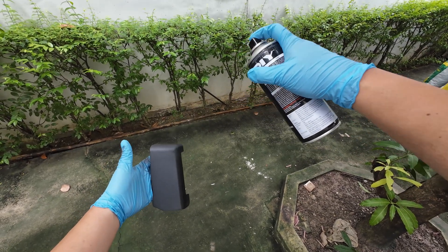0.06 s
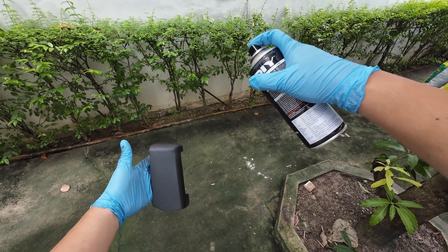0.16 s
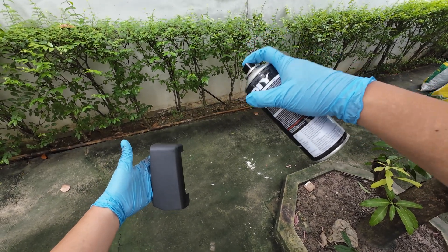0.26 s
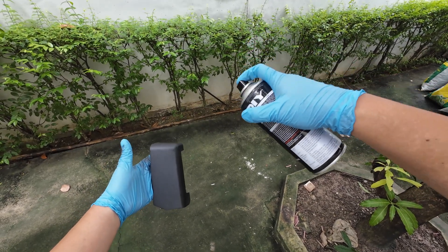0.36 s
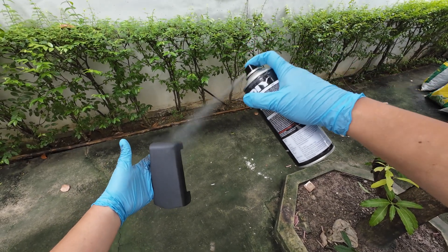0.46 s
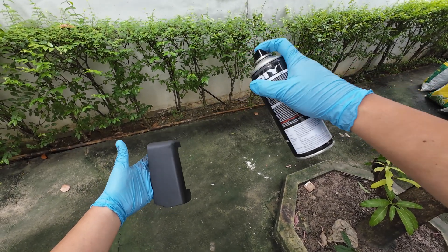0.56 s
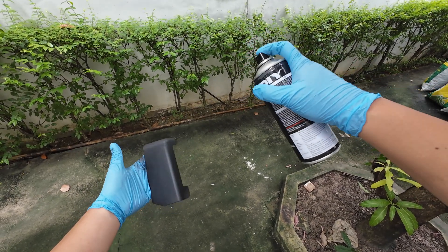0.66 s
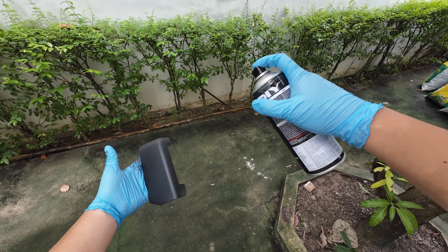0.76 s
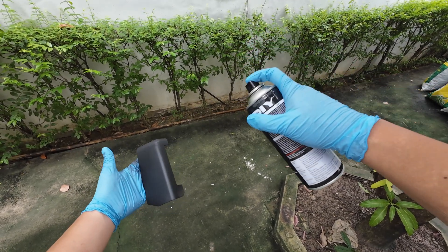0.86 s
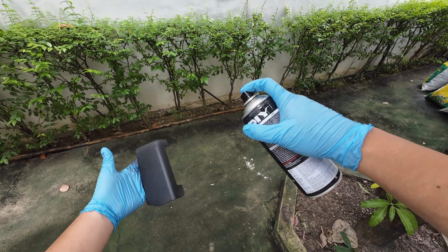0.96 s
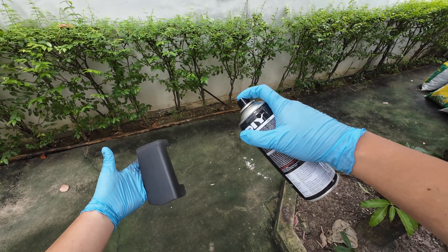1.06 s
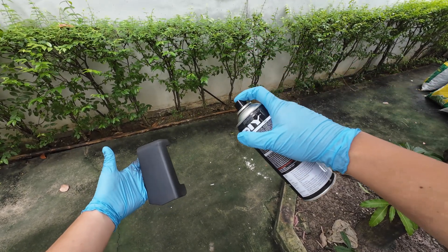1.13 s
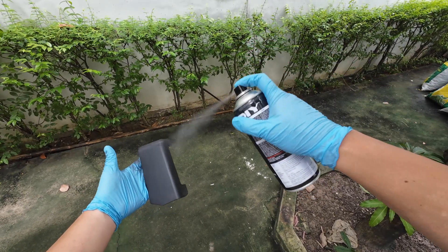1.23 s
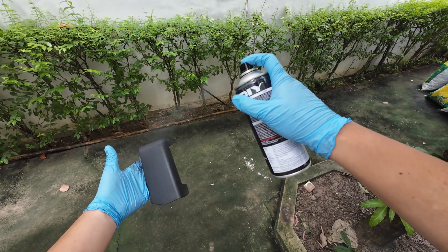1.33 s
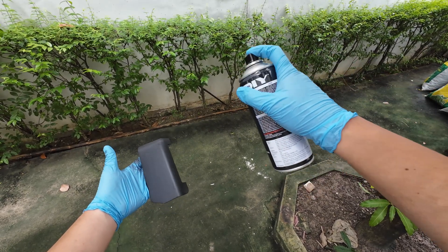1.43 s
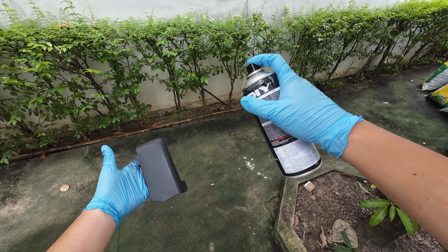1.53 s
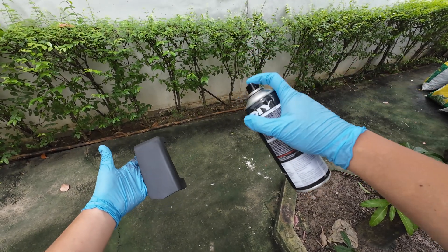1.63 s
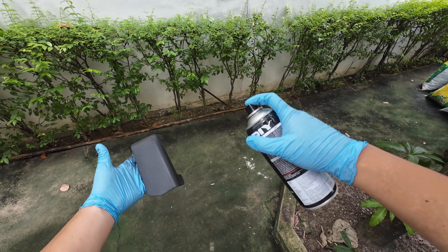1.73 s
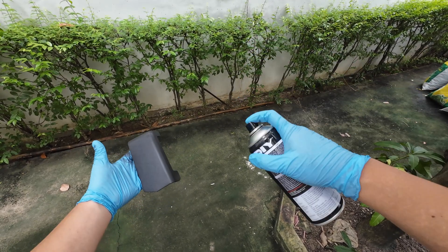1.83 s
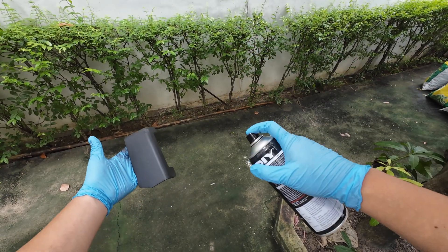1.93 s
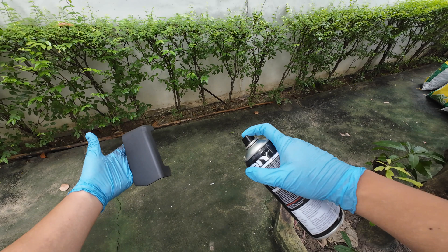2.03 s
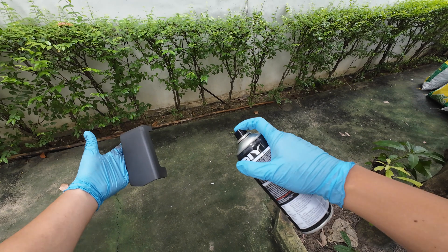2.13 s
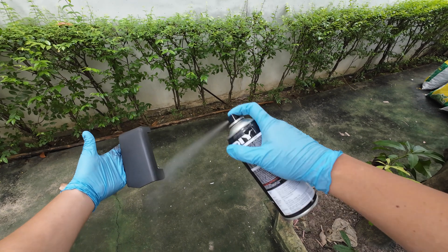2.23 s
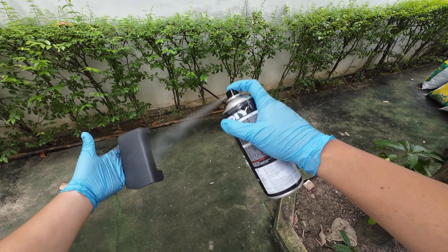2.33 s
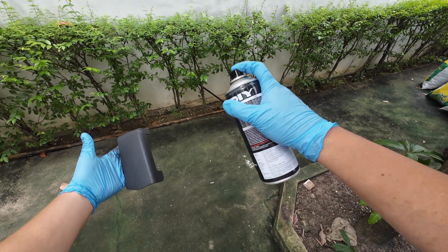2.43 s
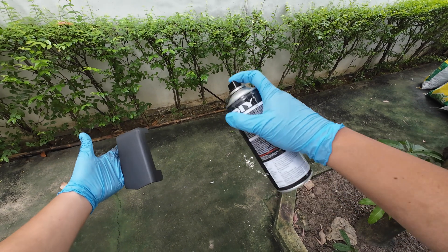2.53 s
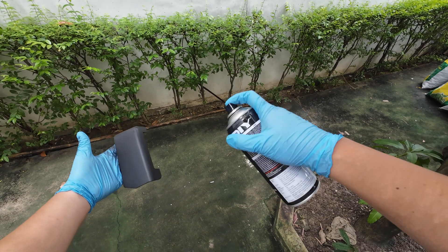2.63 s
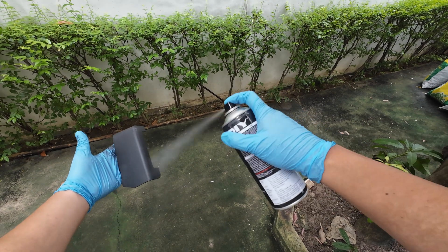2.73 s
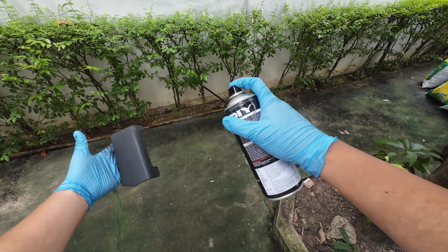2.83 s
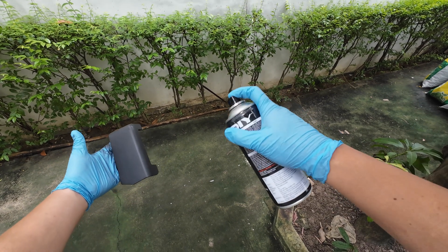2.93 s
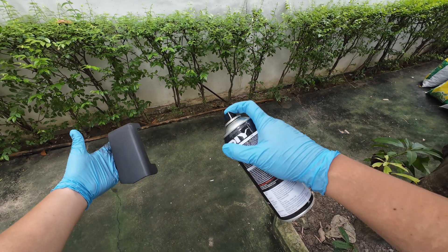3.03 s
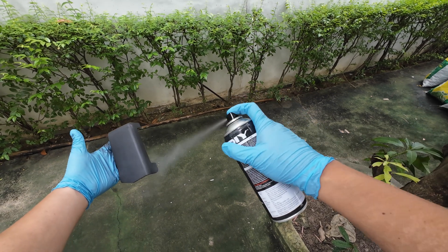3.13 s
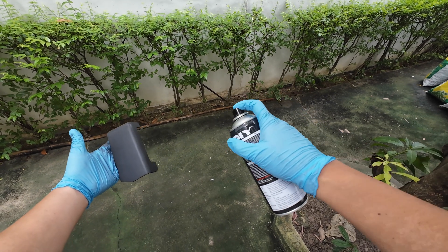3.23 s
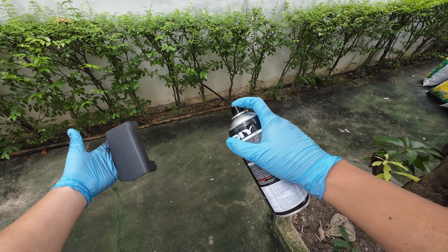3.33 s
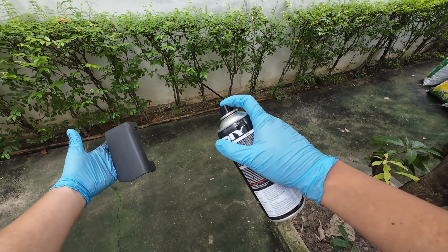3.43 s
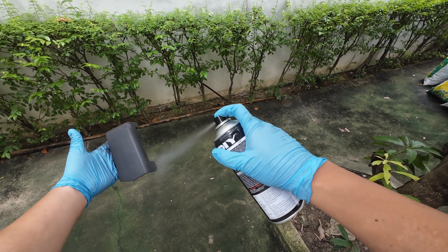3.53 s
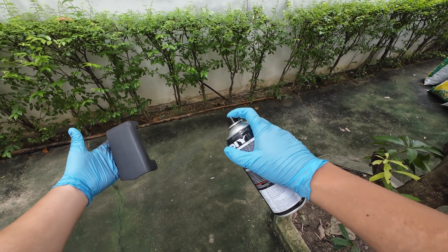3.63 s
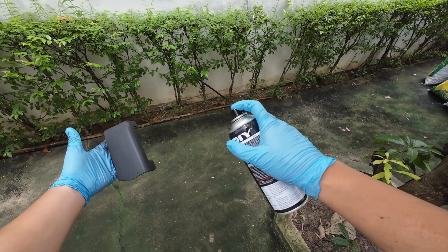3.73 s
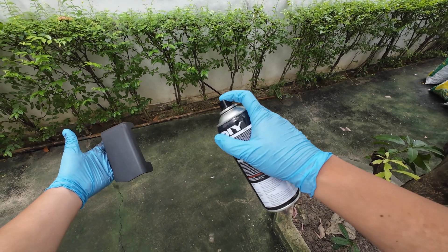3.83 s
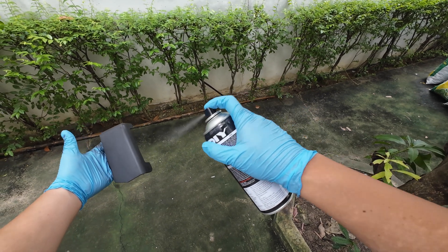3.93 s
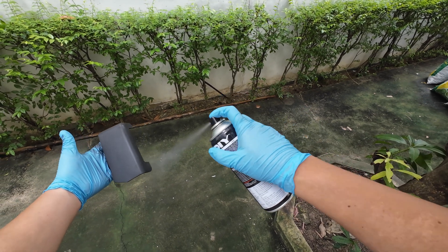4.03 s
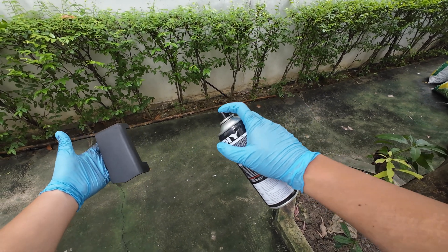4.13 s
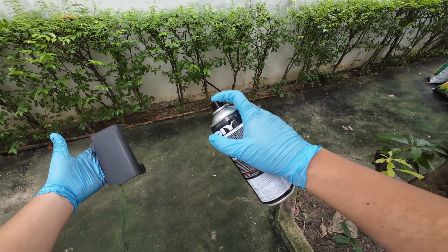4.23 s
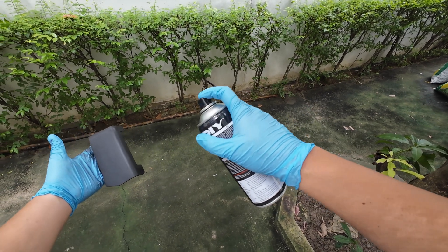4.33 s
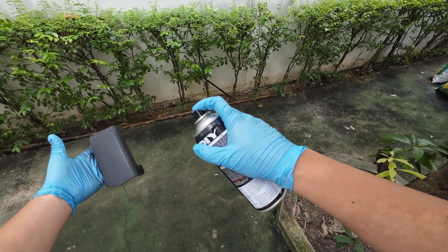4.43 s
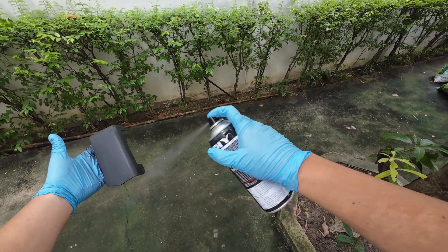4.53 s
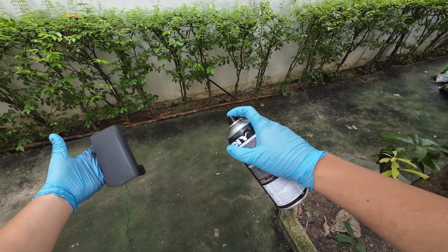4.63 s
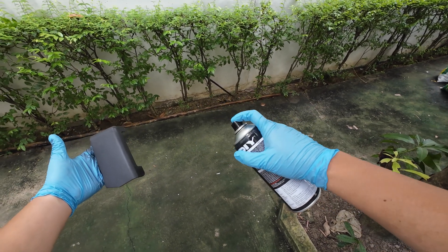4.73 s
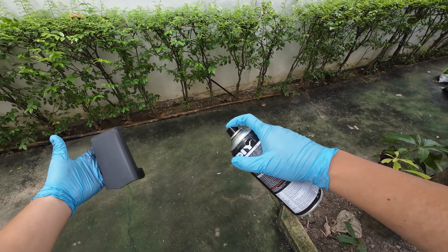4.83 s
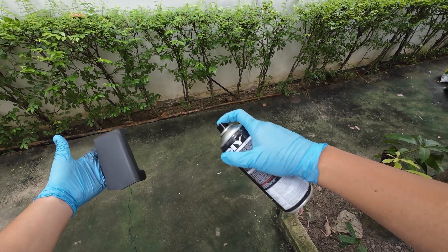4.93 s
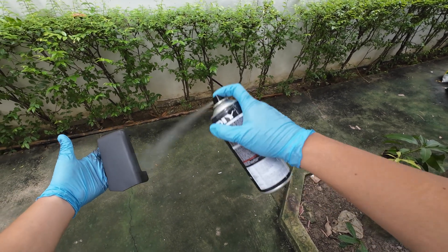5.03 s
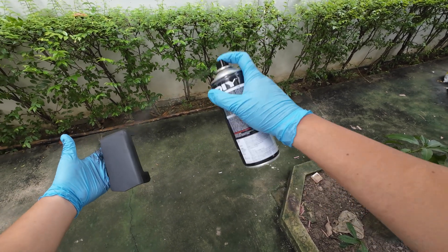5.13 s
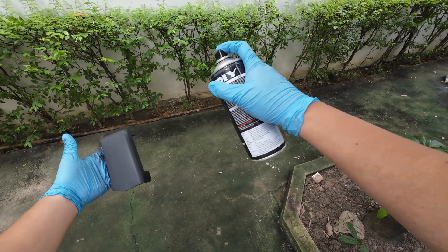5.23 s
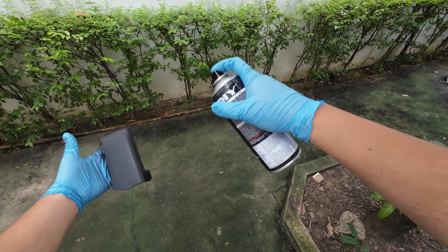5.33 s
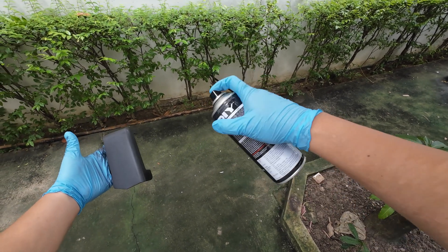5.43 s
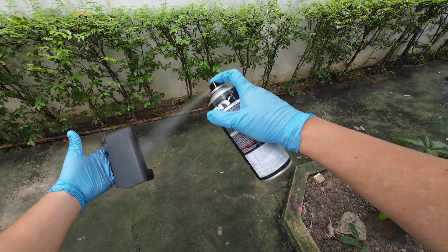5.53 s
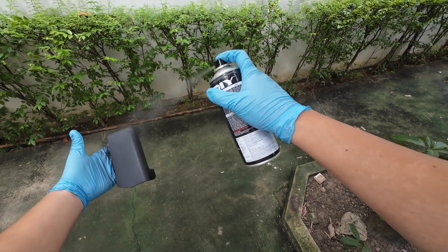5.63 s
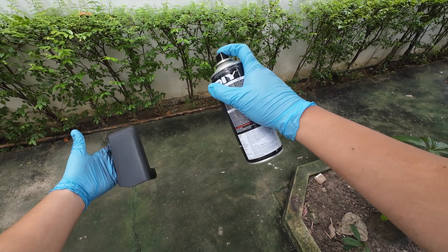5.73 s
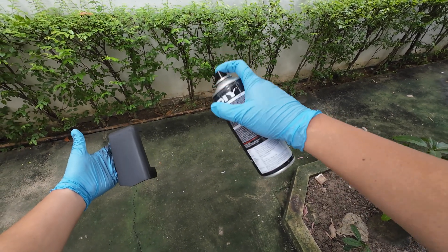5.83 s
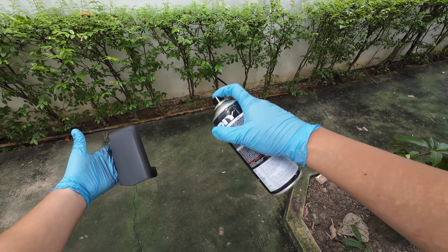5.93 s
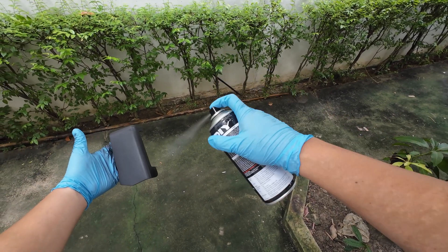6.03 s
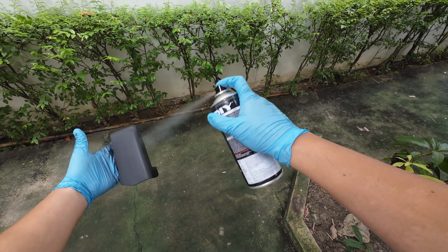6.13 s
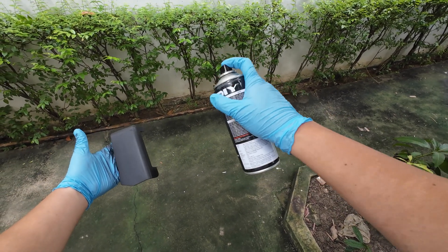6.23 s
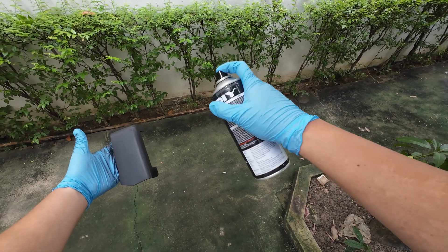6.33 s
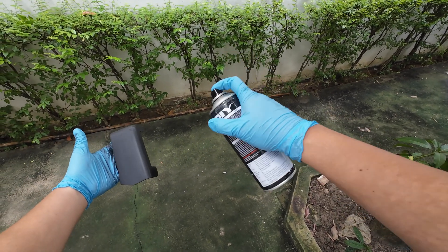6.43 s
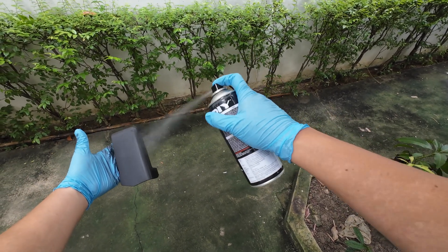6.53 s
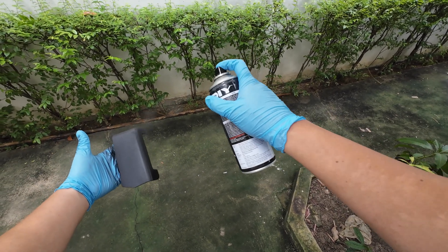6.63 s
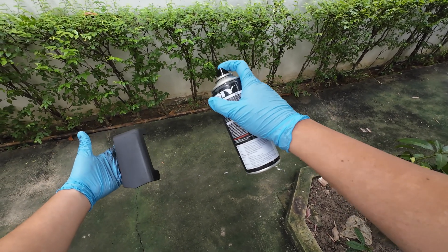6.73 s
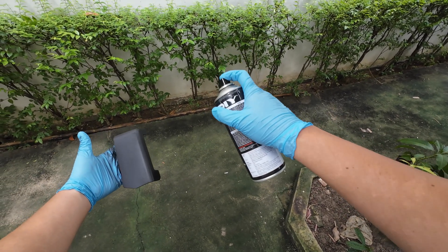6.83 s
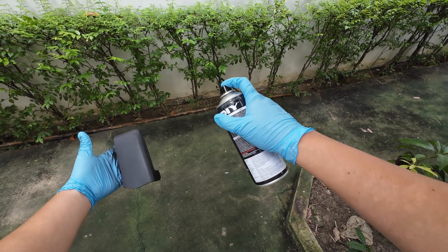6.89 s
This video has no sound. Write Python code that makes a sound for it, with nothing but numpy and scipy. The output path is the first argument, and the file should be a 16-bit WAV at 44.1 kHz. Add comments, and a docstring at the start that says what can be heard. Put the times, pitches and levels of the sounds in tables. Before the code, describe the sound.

In a walled garden, a spray can held at arm's length from the microphone is pressed again and again, giving brief, crisp, sputtering hisses at a steady pace throughout. Each burst leaves a very short reflection from the wall and paving. In the gaps come a low hum of far traffic, a slight wind rumble, faint leaves, distant birds and an occasional tiny tick of a glove unsticking from the can.

```python
"""A walled garden, with an aerosol paint can pressed thirteen times at arm's length.
Each press snaps the valve open, builds, eases off and shuts: the jet hisses and sizzles, the nozzle
cavity sings, paint mist drums on the part. The wall and paving answer briefly. Behind it, far traffic
hums, leaves rustle, a breeze rumbles, birds call, and the glove ticks on the can."""
import sys
import numpy as np
from scipy import signal
from scipy.fft import rfft, irfft, next_fast_len
from scipy.io import wavfile
from scipy.ndimage import uniform_filter1d, map_coordinates

SR = 44100
rng = np.random.default_rng(int(sys.argv[2]) if len(sys.argv) > 2 else 0)


def to_wav(sig):
    """Store sig (one row per channel, or 1-D mono) as 16-bit WAV at the path in sys.argv[1].

    Samples outside -1..1 are clipped; the rate is SR.
    """
    pcm = np.clip(np.atleast_2d(sig), -1, 1) * 32767
    pcm = np.round(pcm).astype(np.int16)
    wavfile.write(sys.argv[1], SR, pcm.T)  # frames by channels


N = 306936

# Tone of each layer: frequency_hz, level_db
TRAFFIC_TONE = [(41, -29.5), (70, -11.5), (102, 4), (136, -7.5), (227, 0), (261, -6.5), (296, 0.5),
                (327, -5), (495, -7), (533, -4.5), (568, -8.5), (739, -12.5), (1400, -33.5), (1820, -58.5),
                (3080, -120)]
LEAF_TONE = [(760, -31.5), (1300, -12), (2000, -11.5), (2860, -12.5), (3200, -15), (4100, -17), (5500, -23),
             (7100, -27.5), (11200, -30), (13100, -28.5), (14200, -41), (15600, -42)]
AIRY_TONE = [(1500, -41), (3000, -3), (5000, 0), (8000, -11), (13000, -13), (15600, -20.5)]
BREEZE_TONE = [(10, -26.5), (22, 0), (30, -1), (55, -0.5), (75, -18.5), (120, -46), (300, -120)]
GARDEN_TONE = [(500, -24), (1500, 7), (3000, -5), (5000, 2.5), (8000, 3.5), (13000, -3), (15500, 0)]
SIZZLE_TONE = [(7500, -44), (8600, -15.5), (9600, -7), (10300, -3.5), (11000, -8), (12000, -2.5),
               (12900, 2), (13300, 1.5), (14000, -9), (14800, -16), (15400, -12.5), (15700, -16.5)]
JET_TONE = [(2600, -57), (3600, 1), (4600, -2), (6000, 1.5), (7500, -1), (8600, 3), (9600, -14),
            (11000, -36.5)]
CAVITY_TONE = [(1120, -45.5), (1900, -20.5), (2220, -6), (2680, -3.5), (2940, -0.5), (3090, -2.5),
               (3440, -13), (3800, -18.5), (4940, -21.5), (8360, -120)]
MIST_TONE = [(120, -28.5), (200, -1), (303, 3), (503, 0), (799, -7), (869, -12.5), (1060, -2), (1340, -3.5),
             (1650, -4), (1810, -12.5), (1900, -7.5), (2470, -18), (4180, -120)]

# Stereo width, as side level against mid: frequency_hz, side_db
FAR_WIDTH = [(60, -22), (110, -16), (200, -14.5), (380, -21), (700, -15.5), (1290, -7.5), (2380, -5.5),
             (4400, -2), (8120, 0), (15000, -1)]
BREEZE_WIDTH = [(20, 0), (45, 1), (65, -9)]
GARDEN_WIDTH = [(700, -13), (2000, -32), (3200, -21.5), (4600, -5), (8000, -3.5), (15000, 3)]
SPRAY_WIDTH = [(200, -25), (700, -15), (1300, -24.5), (2400, -56), (3500, -51.5), (4800, -22),
               (8000, -11.5), (15000, -12.5)]

# Faint airy swells of hiss between the presses: centre_s, half_width_s, level_db
AIRY_SWELLS = [(1.84, 0.16, -76), (2.64, 0.24, -75), (3.45, 0.18, -77), (4.42, 0.12, -78),
               (5.95, 0.16, -77.5), (6.85, 0.079, -72)]
# Far bird whistles: start_s, length_s, start_pitch_hz, end_pitch_hz, level_db
BIRD_NOTES = [(0.139, 0.29, 2920, 2940, -77), (.9, 0.085, 980, 952, -64), (.96, 0.15, 1170, 1135, -69.5),
              (1.42, 0.083, 1130, 1080, -69), (1.92, 0.22, 2900, 2900, -79), (2.45, 0.33, 2940, 2920, -72),
              (3.4, 0.095, 1135, 1110, -66), (3.42, 0.087, 4550, 4500, -80), (3.79, 0.14, 920, 900, -65),
              (4.29, 0.1, 1150, 1150, -63), (4.39, 0.08, 1157, 1140, -67), (4.65, 0.24, 1140, 1107, -68.5),
              (5.2, 0.12, 2950, 2880, -68)]
# Time the garden takes to die away by 60 dB: frequency_hz, decay_s
GARDEN_DECAY = [(900, 0.059), (3000, 0.35), (8000, 0.25), (15000, 0.3)]
# The glove unsticking: start_s, level_db, knock_offset_db
GLOVE_TICKS = [(0.9064, -69, 0), (2.6434, -55, -4), (2.673, -69.5, -4), (5.409, -52, 6.5),
               (6.4668, -65, -2.5)]

# The jet's level on the left against the right: frequency_hz, level_db
JET_LEFT_GAIN = [(4500, -1), (8000, 0.5), (13000, -1)]
# How far the jet's phase leads on the left: frequency_hz, lead_rad
JET_LEFT_LEAD = [(4500, 0.018), (7000, 0.67), (15000, .4)]
# Three treble bands that follow the nozzle's aim: centre_hz, half_width_hz
AIM_BANDS = [(10000, 450), (11900, 500), (14300, 500)]
# Shape of a press, in rows: cracked open, building, full, finger lifts, first drop, valve shuts.
# The sizzle follows the flow; the rest are offsets from it: flow_db, jet_db, cavity_db, mist_db
PRESS_STAGES = [(-16, -9, -15, -31.5), (-4, -6.5, -2.5, -17), (-0.7, -6.5, -3, -17.5), (0, -7.5, -4.5, -21),
                (-5.5, -9, -4.5, -13.5), (-12, -7.5, -8, -19)]
# One row a press: start_s, hold_s, release_s, level_db, sizzle_swell_db, jet_trim_db, cavity_trim_db,
# mist_trim_db, third_notch_hz, chest_echo_share, aim_low_db, aim_mid_db, aim_high_db
VALVE_PRESSES = [(-0.12, 0.12, 0.04, -27, -9, -2.5, -5, -4, 7400, .1, -2, -1.5, -0.3),
                 (0.422, 0.094, 0.051, -25.5, 0, -0.5, -1, -2, 7300, 0.16, .6, 2, -3.5),
                 (1.216, 0.12, 0.045, -26, 2, -2, -2.5, -2.5, 7340, 0.13, -2, 0.5, -2.2),
                 (2.186, 0.2, .044, -27, 2, -0.3, -0.7, 0.1, 7650, 0.22, -0.3, -1, .8),
                 (2.711, 0.11, 0.051, -26.5, 3, -0.5, 0.4, -0.5, 7300, 0.22, 1, -1, 0.5),
                 (3.09, 0.12, 0.049, -27.5, 0, 1.2, 0.9, 2, 7780, 0.23, -0.8, 0, 3),
                 (3.529, 0.1, 0.053, -27.5, -2, 1.3, 0.9, 2.1, 8000, 0.25, -5, -1.5, 4.5),
                 (3.963, .12, 0.05, -29.5, -1, 2.8, 1.9, 4, 7950, 0.35, -4, 1, 13),
                 (4.481, 0.086, 0.046, -30, -1.5, 3, 2.4, 5, 8200, 0.44, -1, 3, 11),
                 (4.988, 0.15, 0.045, -27.5, 1, 0.2, 0.1, 0.4, 7400, 0.1, -1, -0.5, -0.5),
                 (5.506, .152, 0.047, -27, 0.5, -0.5, -1.5, -1, 7170, 0.2, -2, 1, 1.2),
                 (6.052, 0.14, 0.052, -28.5, -1.5, 1.1, 0.7, 1.5, 7550, 0.27, -2.5, -2, 2),
                 (6.505, 0.13, 0.048, -27.5, -2.5, 0.3, 0.4, 0.6, 7300, 0.21, -2.5, -2.5, -.6)]

TRAFFIC_DB, BREEZE_DB, HEDGE_DB = -50.5, -57, -72.5
RISE_S, FULL_S, DROP_S = 0.024, 0.048, 0.012  # building and full after opening; first drop after lifting
ECHO_SKEW = 0.037  # the left chest echo comes later by this share of its delay
TOP_HZ = 15714


def amp(db):
    """Decibels to gain."""
    return 10 ** (np.asarray(db) / 20)


def unit(x):
    """Scale to an rms of 1."""
    return x / np.sqrt(np.mean(x ** 2) + 1e-20)


def along(points, hz):
    """Read a curve of (frequency, value) points on a log frequency axis."""
    frequencies, values = np.transpose(points)
    return np.interp(np.log(hz + 1), np.log(frequencies + 1), values)


def wobble(rate_hz):
    """A smooth random drift, with rate_hz turning points a second."""
    knots = rng.standard_normal(int(N * rate_hz / SR) + 4)
    return map_coordinates(knots, [np.arange(N) * rate_hz / SR])


def filtered(x, response):
    """EQ x with a gain given as a function of frequency."""
    size = next_fast_len(N + 8192)
    return irfft(rfft(x, size) * response(np.fft.rfftfreq(size, 1 / SR)), size)[..., :N]


def spread(pair, tone, width):
    """Colour two unrelated signals as mid and side, then mix to left and right."""
    mid, side = filtered(pair, lambda hz: amp(along(tone, hz) + [0 * hz, along(width, hz)]))
    return np.array([mid + side, mid - side])


def rush(tone, width, patchy_db, bins, frames, size=256):
    """Stereo noise with a mid rms of 1, mottled by patches of random gain, bins by frames in size."""
    spectra = signal.stft(rng.standard_normal((2, N), np.float32), nperseg=size)[2]
    patches = uniform_filter1d(rng.standard_normal(spectra.shape[1:]), bins, axis=0)
    patches = unit(uniform_filter1d(patches, frames, axis=1))
    mottled = signal.istft(spectra * amp(patchy_db * patches).astype(np.float32), nperseg=size)[1]
    pair = spread(mottled[:, :N], tone, width)
    return pair / np.std(pair.mean(0))


def traffic():
    """Far traffic lays down a low, gently wavering hum."""
    level = amp(TRAFFIC_DB + 0.39 * wobble(4.7))
    return level * rush(TRAFFIC_TONE, FAR_WIDTH, patchy_db=3.0, bins=1, frames=4, size=2048)


def hedge():
    """The hedge rustles steadily."""
    return amp(HEDGE_DB) * rush(LEAF_TONE, FAR_WIDTH, patchy_db=1.1, bins=28, frames=8, size=1024)


def airy_swells():
    """Faint airy swells of hiss between the presses."""
    t = np.arange(N) / SR
    level = sum(amp(db) * np.exp(-((t - centre_s) / width_s) ** 2)
                for centre_s, width_s, db in AIRY_SWELLS)
    return level * unit(spread(rng.standard_normal((2, N)), AIRY_TONE, FAR_WIDTH))


def breeze():
    """A light breeze buffets each side on its own: a lumpy rumble, leaning left."""
    shared_db = BREEZE_DB + 1.2 * wobble(2.5)
    sides_db = 1.4 * np.array([wobble(3.9), wobble(7.5)]) + [[1.3], [-1.3]]
    rumble = unit(spread(rng.standard_normal((2, N)), BREEZE_TONE, BREEZE_WIDTH))
    return amp(shared_db + sides_db + 2) * rumble


def birds():
    """Soft whistles from far off, smeared and wavering in the air."""
    out = np.zeros(N)
    waver, drift = amp(3 * wobble(60)), 1 + 0.009 * wobble(90)
    for start_s, length_s, start_hz, end_hz, db in BIRD_NOTES:
        start, n = round(start_s * SR), int(length_s * SR)
        pitch_hz = np.linspace(start_hz, end_hz, n) * drift[start:start + n]
        phase = 2 * np.pi * np.cumsum(pitch_hz) / SR
        out[start:start + n] += amp(db) * np.hanning(n) ** 0.17 * np.sin(phase)
    return out * waver


def garden_reverb(x):
    """Wall, hedge and paving scatter a short tail; the paths change as the can moves."""
    lead, step = SR // 10, SR // 4
    hz, t, spectra = signal.stft(rng.standard_normal((5, 2, SR // 3)), SR, nperseg=128)
    decay = amp(-60 * t / along(GARDEN_DECAY, hz)[:, None])
    tails = signal.istft(spectra * decay, SR, nperseg=128)[1]
    # The first press is already under way, so the garden is already ringing.
    earlier = unit(np.convolve(x[:1000], rng.standard_normal(lead))[:lead])
    send = np.append(amp(7.5) * earlier * np.std(x[:1000]), x)
    wet = np.zeros((2, N + 2 * SR))
    for k, start in enumerate(range(0, len(send), step)):
        tail = tails[k % len(tails)]
        answer = signal.fftconvolve(send[None, start:start + step], tail / np.linalg.norm(tail[0]), axes=1)
        wet[:, start:start + answer.shape[1]] += answer
    return spread(wet[:, lead - 400:][:, :N], GARDEN_TONE, GARDEN_WIDTH)  # 9 ms of pre-delay


def glove_ticks():
    """The glove unsticks from the can: a short bright crack with a tin knock."""
    layers, t = np.zeros((2, N + SR)), np.arange(SR // 20) / SR
    for start_s, db, knock_db in GLOVE_TICKS:
        crack = amp(db - 60 * t / 0.012) * rng.standard_normal(len(t))
        knock = amp(db + knock_db - 60 * t / 0.02) * rng.standard_normal(len(t))
        start = round(start_s * SR)
        layers[:, start:start + len(t)] += [crack, knock]
    crisp = lambda hz: amp(np.maximum(along(SIZZLE_TONE, hz) + 6, along(JET_TONE, hz) - 5))
    tinny = lambda hz: amp(along(CAVITY_TONE, hz * 1.2) + 9)
    return filtered(layers[0, :N], crisp) + filtered(layers[1, :N], tinny)


def held_at_arms_length(jet, third_notch_hz, echo_share, *aim_db):
    """An echo off the painter's chest combs the treble; the nozzle's aim recolours the top."""
    hz, sign = np.fft.rfftfreq(jet.shape[1], 1 / SR), np.array([[1], [-1]])
    delay_s = 2.5 / third_notch_hz * (1 + sign * ECHO_SKEW / 2)  # 2.5 cycles late at the third notch
    echo = echo_share / (1 + (3500 / (hz + 1)) ** 4)  # longer waves bend round the body
    echo /= 1 + (hz / 11800) ** 12  # the shortest sink into cloth
    comb = (1 + echo * np.exp(-2j * np.pi * hz * delay_s)) / np.sqrt(1 + echo ** 2)
    apart = sign * np.clip((hz - 4300) / 500, 0, 1) / 2  # only short waves are panned
    pan = amp(apart * along(JET_LEFT_GAIN, hz)) * np.exp(1j * apart * along(JET_LEFT_LEAD, hz))
    aim = amp(sum(db * np.exp(-((hz - centre_hz) / width_hz) ** 2)
                  for (centre_hz, width_hz), db in zip(AIM_BANDS, aim_db)))
    return irfft(rfft(jet) * comb * pan * aim, jet.shape[1])


def spray():
    """Valve flow drives sizzle, jet body, nozzle cavity and mist; liquid paint makes them sputter."""
    sputter = unit(amp(0.27 * wobble(70) + 0.4 * wobble(500)))
    sizzle = rush(SIZZLE_TONE, SPRAY_WIDTH, patchy_db=2.1, bins=3, frames=15)
    jet = rush(JET_TONE, SPRAY_WIDTH, patchy_db=1.5, bins=3, frames=12)
    cavity = rush(CAVITY_TONE, SPRAY_WIDTH, patchy_db=1.2, bins=1, frames=11)
    mist = amp(3) * rush(MIST_TONE, SPRAY_WIDTH, patchy_db=2.8, bins=3, frames=6, size=512)
    layers = sputter * np.array([sizzle, jet, cavity, mist])
    flow_db, *offsets_db = np.transpose(PRESS_STAGES)
    out = np.zeros((2, N))
    for start_s, hold_s, release_s, db, swell_db, jet_db, cavity_db, mist_db, *pose in VALVE_PRESSES:
        stages_s = start_s + np.array([0, RISE_S, FULL_S, hold_s, hold_s + DROP_S, hold_s + release_s])
        span = max(round(start_s * SR) - 512, 0) + np.arange(2 ** 14)
        t = span / SR
        snap_open = np.clip((t - start_s) / 0.0012, 0, 1)
        drain = amp(-60 * np.maximum(t - stages_s[-1], 0) / 0.03)
        sizzle_db = swell_db * np.interp(t, stages_s[2:5], [-0.5, 0.5, 0])
        levels_db = [db + np.interp(t, stages_s, flow_db + offset) + trim
                     for offset, trim in zip((0, *offsets_db), (sizzle_db, jet_db, cavity_db, mist_db))]
        envelopes = snap_open * drain * amp(levels_db)
        envelopes[:2] *= 1 + 0.72 * amp(-60 * np.abs(t - start_s) / 0.024)  # the first gas spits out
        burst = (envelopes[:, None] * layers[:, :, span]).sum(0)
        out[:, span] += held_at_arms_length(burst, *pose)
    return out


def scene():
    """The can up close, with a touch of garden reverb, over the outdoor bed."""
    near = spray() + glove_ticks()
    reverb = amp(-14.5) * garden_reverb(near.mean(0))
    return near + reverb + birds() + traffic() + hedge() + airy_swells() + breeze()


def record(dry):
    """A steep high cut takes off the very top."""
    return filtered(dry, lambda hz: np.sin(np.pi / 2 * np.clip((TOP_HZ + 90 - hz) / 160, 0, 1)) ** 2)


dry = scene()
out = record(dry)
to_wav(out)
```